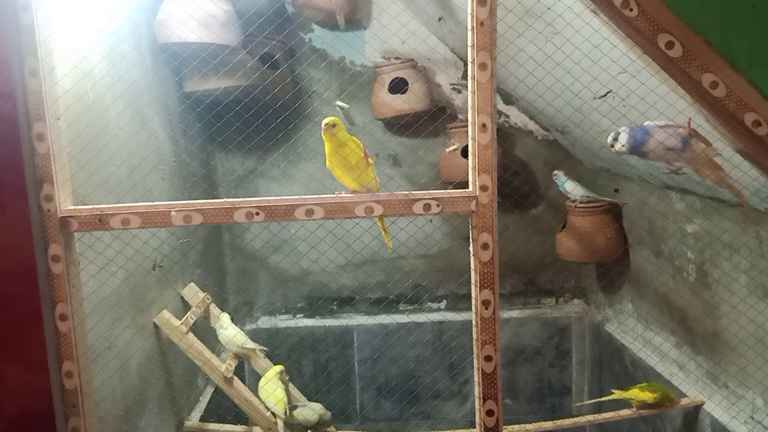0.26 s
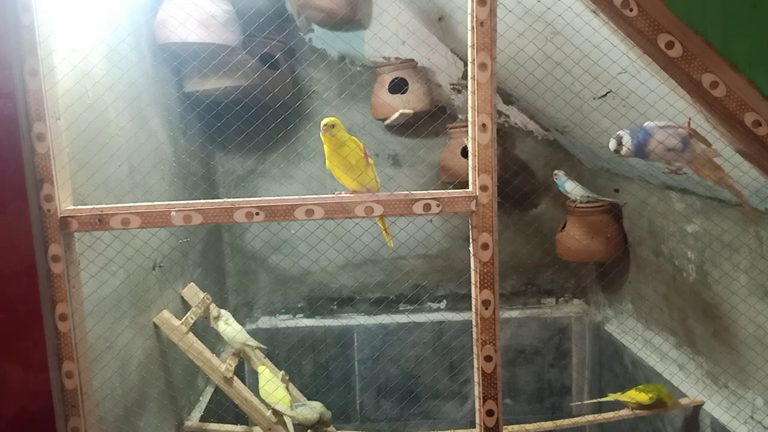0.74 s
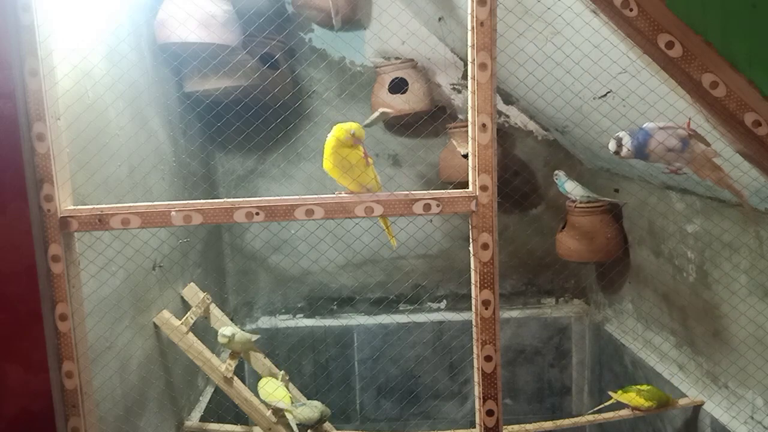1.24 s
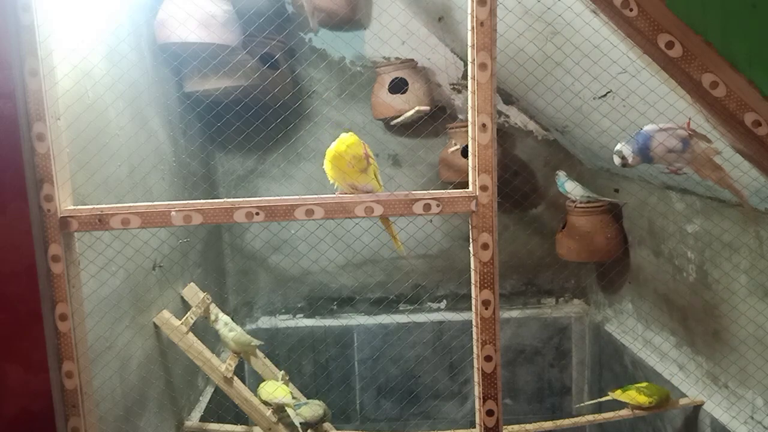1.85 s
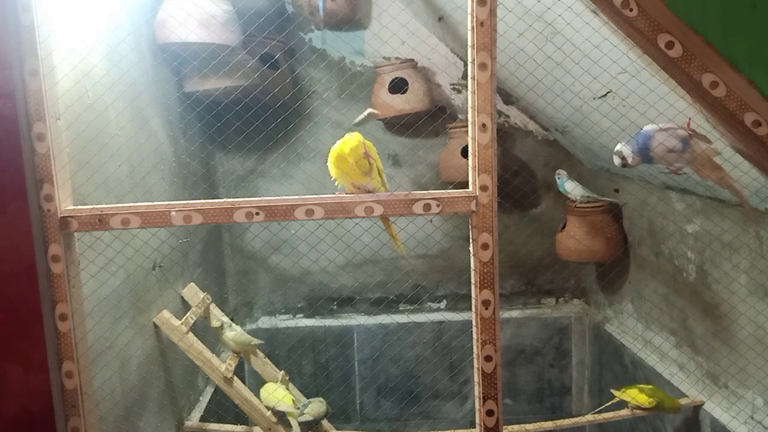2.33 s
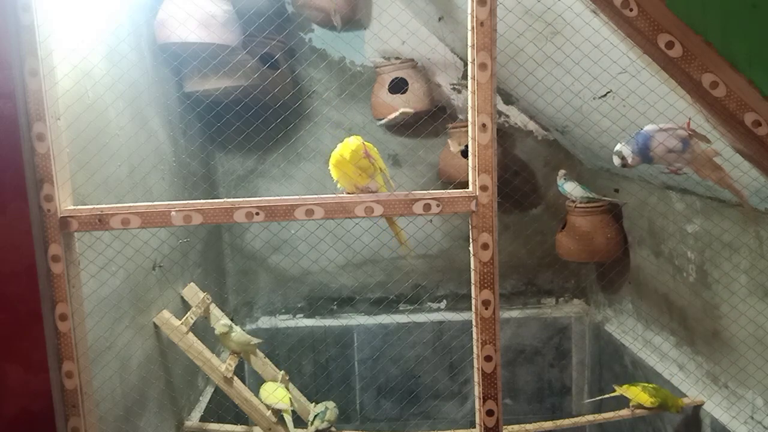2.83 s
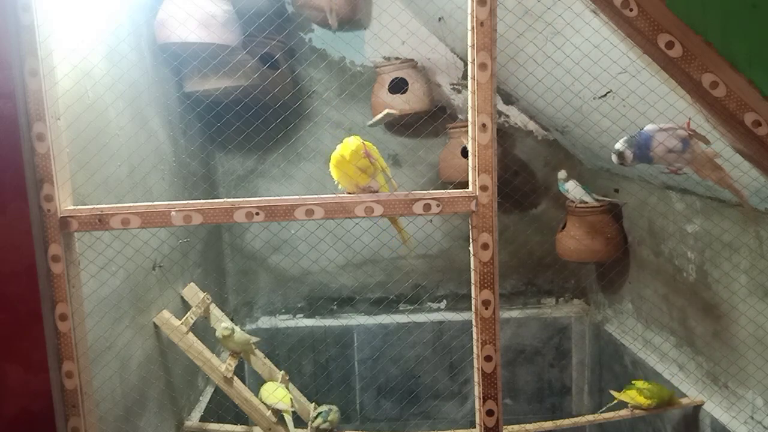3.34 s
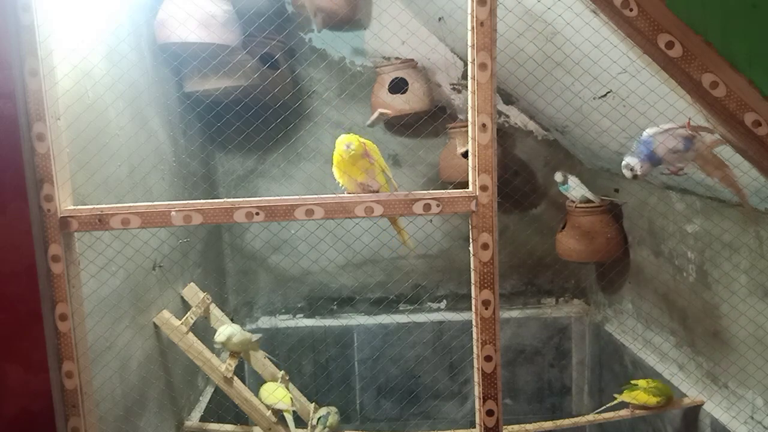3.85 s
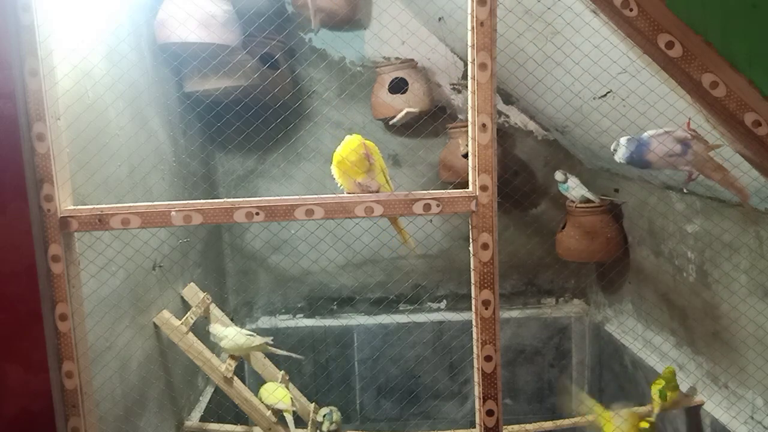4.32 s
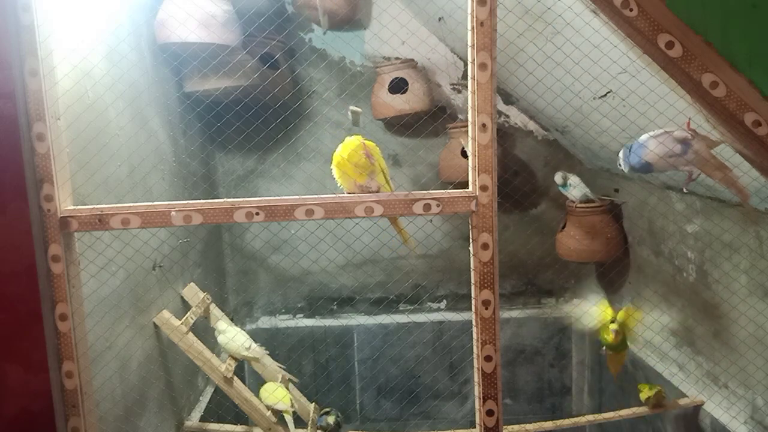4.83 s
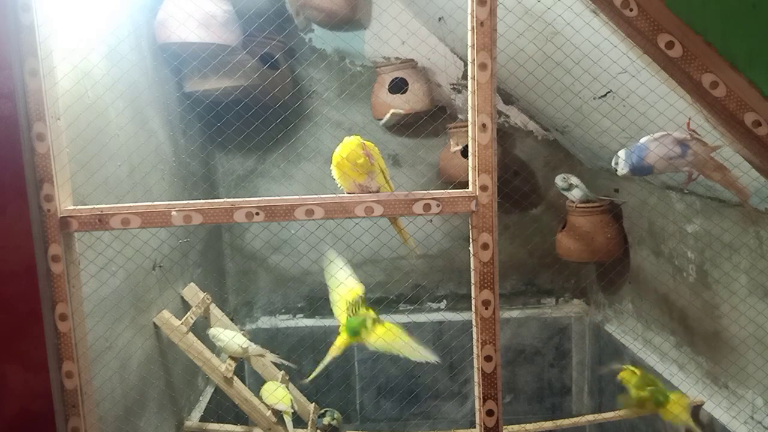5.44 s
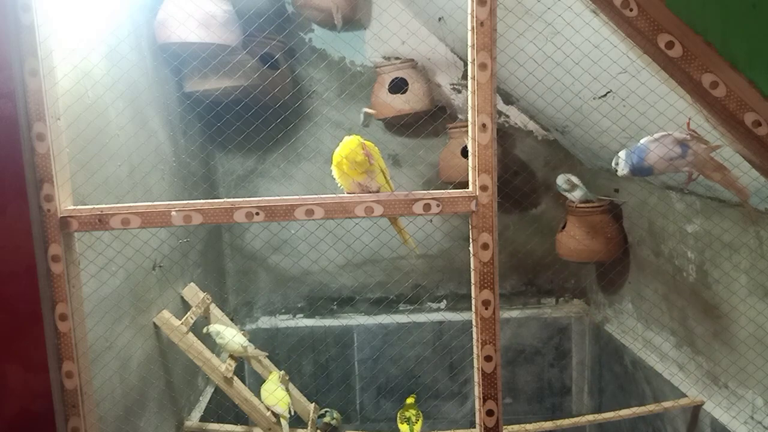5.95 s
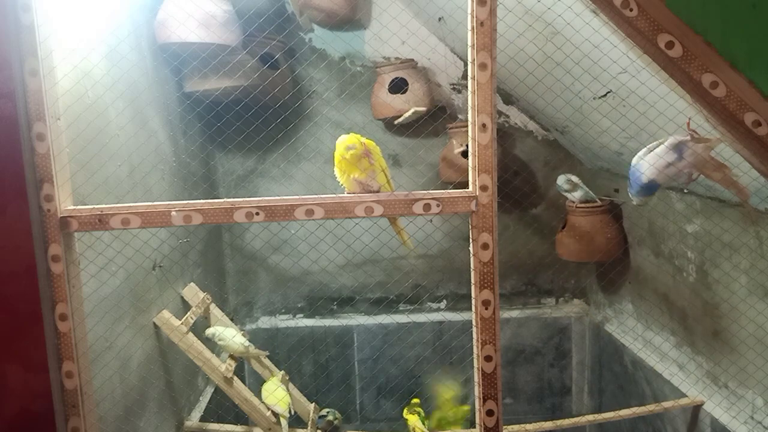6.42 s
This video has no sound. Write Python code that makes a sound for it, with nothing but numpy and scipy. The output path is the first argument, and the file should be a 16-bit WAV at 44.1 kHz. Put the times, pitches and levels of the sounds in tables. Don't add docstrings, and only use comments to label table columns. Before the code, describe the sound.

In a hard-walled aviary, a small parrot gives a quick bright whistle and throaty squawk. Sparse mutters and faint coos follow, then hoarse chatter bursts. After a lull with light wing flaps, denser chatter runs into a loud warble and raspy squawks, with soft fluttering to the end. Room hiss and a thin motor hum continue; stereo camera microphones have dull treble.

```python
import sys
import numpy as np
from scipy import signal
from scipy.io import wavfile
from scipy.ndimage import uniform_filter1d

SR = 44100
rng = np.random.default_rng(int(sys.argv[2]) if len(sys.argv) > 2 else 0)


def attenuation_scalar(level_db):
    decades = np.asarray(level_db, float) / 20
    return 10 ** decades


def generate_wav(signal):
    frames = np.transpose(np.atleast_2d(signal))
    scaled = np.clip(frames, -1, 1) * 32767
    pcm = np.round(scaled).astype(np.int16)
    wavfile.write(sys.argv[1], SR, pcm)


N = 294588


def evened(x):
    return x / np.sqrt(np.mean(x ** 2) + 1e-20)


def read(points, hz):
    f, value = np.transpose(points)
    return np.interp(np.log(hz + 1), np.log(f + 1), value)


def add(mix, s, sound, pan_db=0.):
    part = mix[:, round(s * SR):][:, :len(sound)]
    part += sound[:part.shape[1]] * attenuation_scalar(np.array([[pan_db / 2], [-pan_db / 2]]))


def drift(length, span):
    span = max(int(span), 2)
    return evened(uniform_filter1d(uniform_filter1d(rng.standard_normal(length), span), span))


def resonate(x, hz, width):
    turn = np.exp(2j * np.pi * np.cumsum(hz * np.ones(len(x))) / SR)
    r = np.exp(-np.pi * width / SR)
    low = signal.lfilter([1 - r], [1, -r], x / turn)
    low = signal.lfilter([1 - r], [1, -r], low)
    return 2 * (turn * low).real


def whistles():
    # (start t/s, length t/s, start f/Hz, end f/Hz, level/dB)
    contact = [
        (.543, .018, 4450, 4640, -41),
        (.555, 0.022, 4660, 3293, -26.5),
        (.568, .03, 3355, 3170, -22.5),
        (.578, 0.09, 3980, 3950, -27.5),
        (.604, 0.071, 3280, 3150, -26.5),
    ]
    mutter = [
        (1.784, 0.026, 2420, 2205, -39),
        (1.81, 0.043, 2280, 2096, -39),
        (3.893, 0.047, 1180, 1340, -49),
        (4.012, 0.039, 2200, 2300, -43),
        (4.072, 0.068, 2300, 2530, -47),
        (2.62, .02, 2400, 2460, -43),
        (2.895, .04, 1250, 1350, -50.5),
        (0.93, .022, 4700, 4000, -50),
        (.94, 0.0299, 1300, 1650, -53),
    ]
    twitter = [
        (2.752, .03, 2050, 2410, -42),
        (2.82, 0.0288, 1950, 2090, -42.5),
    ]
    rising = [
        (4.387, 0.031, 1486, 1820, -40.5),
        (4.408, 0.034, 1840, 2097, -27.5),
    ]
    warble = [
        (4.435, 0.0684, 2074, 2350, -24.5),
        (4.478, 0.0601, 2600, 3084, -22.5),
        (4.54, .05, 2970, 3000, -29),
        (4.585, 0.031, 3000, 3006, -20.5),
        (4.612, 0.0217, 2926, 2460, -21),
        (4.54, 0.0259, 2420, 2023, -23.5),
        (4.566, 0.0284, 2006, 2380, -20.5),
        (4.595, 0.033, 2100, 2410, -25.5),
    ]
    pips = [
        (4.45, 0.02, 6220, 6330, -24.5),
        (5.846, 0.022, 5700, 5400, -28),
        (5.845, 0.0184, 6900, 5800, -21),
    ]
    # (notes, left over right level/dB, overtone level/dB)
    birds = [(contact, -3.5, -17.5), (mutter, -4.5, -33), (twitter, -4, -1),
             (rising, -2, -11), (warble, -5.5, -28), (pips, 0, -42)]
    hoarse = [.14, .22, .1, .18, .19, .16]
    glide_share, edge_share = 0.4, 0.42
    third_db = -3
    out = np.zeros((2, N))
    for (notes, pan_db, over_db), rough in zip(birds, hoarse):
        for s, length, from_hz, to_hz, db in notes:
            t = np.arange(0, length, 1 / SR)
            hz = to_hz + (from_hz - to_hz) * np.exp(-(t / (length * glide_share)) ** 1.5)
            hz = hz * (1 + 0.12 * rough * drift(len(t), 60))
            turns = 2 * np.pi * np.cumsum(hz) / SR
            overtones = np.sin(2 * turns) + attenuation_scalar(third_db) * np.sin(3 * turns)
            tone = np.sin(turns) + attenuation_scalar(over_db) * overtones
            flutter = 1 + 0.84 * rough * drift(len(t), 45)
            swell = signal.windows.tukey(len(t), edge_share)
            add(out, s, np.sqrt(2) * attenuation_scalar(db) * tone * flutter * swell, pan_db)
    return out


def squawks():
    # (start t/s, length t/s, effort level/dB, throat level re effort/dB, beak f/Hz)
    calls = [
        (.595, 0.078, -39, 10, 6040),
        (1.957, 0.032, -37, -1.5, 5820),
        (2.175, .088, -35, -3, 5750),
        (4.443, 0.053, -27.5, -8, 5970),
        (4.634, 0.06, -23.5, -6, 6060),
        (4.928, .095, -26, -6, 6230),
        (5.276, 0.096, -26, -5, 6140),
        (5.829, .085, -23.5, -8, 6190),
    ]
    throats = [3020, 3150, 2750, 2350, 3020, 3370, 3150, 3000]
    pans = [-2, 5.5, -1.5, 1, 1, -3, 0, -1.5]
    shrills = [-7, -12, -14.5, -6, -7.5, -8.5, -7.5, -7.5]
    # (factor on beak pitch, width f/Hz, level/dB)
    beak_bands = [(0.94, 1640, -11), (0.789, 670, -14), (1.003, 520, -14.5)]
    # (factor on throat pitch, width f/Hz, level/dB)
    throat_bands = [(1.05, 1460, 14), (0.67, 1400, -4.5), (1.215, 220, 10.5)]
    # (f/Hz, width f/Hz, level/dB)
    shrill_bands = [(8600, 1500, -12), (10400, 2400, -10), (12200, 2400, -13), (14000, 2600, -18)]
    rise_s, fall_s, swell_db = 0.012, 0.0056, 1.5
    puffs_per_s = 158
    beak_sag, throat_lift = 0.047, 0.017
    dip_db, dip_at, dip_width = -0.5, -0.15, 0.057
    out = np.zeros((2, N))
    for (s, length, db, low_db, top_hz), low_hz, pan_db, shrill_db in zip(calls, throats, pans, shrills):
        t = np.arange(0, length, 1 / SR)
        along = t / length - 0.5
        beak_hz = top_hz * (1 - beak_sag * along)
        throat_hz = low_hz * (1 + throat_lift * along)
        turns = np.cumsum(puffs_per_s * (1 + 0.15 * drift(len(t), 200))) / SR
        pulses = np.diff(np.floor(turns), prepend=0) * attenuation_scalar(rng.uniform(-4, 3, len(t)))
        puffs = (0.2 + np.exp(-(turns % 1) / 0.3)) * rng.standard_normal(len(t))
        drive = 0.28 * evened(pulses) + 0.72 * evened(puffs)
        beak = sum(attenuation_scalar(g) * resonate(drive, beak_hz * k, w) for k, w, g in beak_bands)
        beak += attenuation_scalar(shrill_db) * sum(attenuation_scalar(g) * resonate(drive, hz, w) for hz, w, g in shrill_bands)
        throat = sum(attenuation_scalar(g) * resonate(drive, throat_hz * k, w) for k, w, g in throat_bands)
        voice = evened(beak) + attenuation_scalar(low_db) * evened(throat)
        edges = np.clip(np.minimum(t / rise_s, (length - t) / fall_s), 0, 1)
        catch_db = dip_db * np.exp(-((along - dip_at) / dip_width) ** 2)
        effort = edges * attenuation_scalar(db + swell_db * along + catch_db)
        add(out, s, effort * voice, pan_db)
    no_bass = signal.butter(6, 1750, "high", fs=SR, output="sos")
    return signal.sosfilt(no_bass, out)


def chatter():
    # (t/s, peak level/dB, twice the pitch
    # f/Hz, mouth f/Hz, chest level/dB)
    chatter_notes = [(0.946, -54, 2070, 3260, -9), (1.08, -31, 2192, 4440, -31),
                     (1.751, -40, 2280, 2880, 0.5), (1.871, -36.5, 2170, 3100, -6),
                     (2.432, -28, 2240, 3000, -33), (2.499, -33, 2423, 3000, -17),
                     (2.625, -18.5, 2452, 3360, -24), (2.7009, -23.5, 2182, 3500, -15),
                     (2.742, -30, 2064, 3180, -34), (2.756, -31, 2350, 4800, -19),
                     (2.8244, -26.5, 2098, 4350, -18), (2.896, -22.5, 2105, 2900, -16),
                     (3.44, -44.5, 2190, 3080, 3.5), (3.891, -31, 2156, 3230, -5),
                     (3.949, -22, 1984, 4020, -17), (4.0128, -20.5, 2274, 3500, -12.5),
                     (4.069, -22.5, 2380, 4370, -12), (4.1344, -31, 2435, 3270, -9),
                     (4.188, -21, 2282, 3700, -11), (4.2674, -27, 2270, 3300, -9.5),
                     (4.338, -23, 2570, 3240, -12.5), (4.359, -22, 2074, 3140, -38)]
    fade_s = 0.016
    out = np.zeros((2, N))
    for s, db, twice_hz, mouth_hz, chest_db in chatter_notes:
        t = np.arange(0, 0.09, 1 / SR)
        hz = twice_hz / 2 * (1 + 0.04 * drift(len(t), 60) - 0.15 * np.exp(-t / 0.005))
        turns = np.cumsum(hz) / SR
        stack = sum(np.cos(2 * np.pi * k * turns) for k in range(1, 8))
        drive = 0.6 * evened(stack) + 0.75 * rng.standard_normal(len(t))
        voice = 1.3 * resonate(drive, mouth_hz, 1200)
        voice += 0.35 * resonate(drive, twice_hz, 600) + 0.8 * resonate(drive, 2 * twice_hz, 900)
        voice += 1.1 * resonate(drive, 4300, 1800) + 0.56 * resonate(drive, 5450, 1200)
        voice += 0.6 * resonate(drive, 9000, 3500)
        chest = evened(resonate(drive, twice_hz / 2, 890))
        voice = evened(voice) + attenuation_scalar(chest_db - 4.0) * chest
        shape = (1 - np.exp(-t / 0.003)) * np.exp(-(t / fade_s) ** 2)
        add(out, s - 0.003, attenuation_scalar(db - 7.5) * voice * shape, -2.)
    return out


def knocks():
    # (t/s, peak level/dB, wood f/Hz, wire rattle level re peak/dB, fading time t/s)
    taps_on_wood = [
        (0.967, -60, 1590, -46, 0.0069),
        (2.564, -51, 1680, -47, 0.0069),
        (3.152, -61, 1680, -45, 0.014),
        (3.218, -66, 1600, -34, 0.012),
        (4.296, -49, 2760, -49, 0.0037),
        (4.392, -47.5, 2500, -36, 0.0086),
        (4.934, -51, 5800, -38, 0.0037),
        (5.487, -50, 2650, -28.5, 0.0085),
        (6.571, -49.5, 2130, -66, 0.005),
    ]
    out = np.zeros((2, N))
    for s, db, hz, wire_db, length in taps_on_wood:
        t = np.arange(0, 0.06, 1 / SR)
        air = rng.standard_normal(len(t))
        knock = evened(resonate(air, hz, 1200) + 0.8 * resonate(air, 3200, 5000))
        knock += attenuation_scalar(wire_db + 35.0) * evened(resonate(air, 9900, 8900))
        shape = (1 - np.exp(-t / 0.0082)) * np.exp(-t / max(length, 0.002))
        add(out, s - 0.002, attenuation_scalar(db + 24) * knock * shape, -1.)
    return out


def wings():
    # (start t/s, length t/s, thump level/dB, boom level re thump/dB, swish level re thump/dB)
    bouts = [(3.1, 0.21, -55, 1.5, 9.5), (3.28, 0.19, -59, -5, 8.5), (4.394, 0.23, -52, -18, 1),
             (4.601, 0.23, -50.5, -22, 4.5), (4.8, .45, -58, -26, -14), (5.198, 0.49, -57, -10, -8),
             (5.47, 0.17, -52.5, 2.5, 9), (5.597, 0.26, -47.5, -6.5, 5.5), (5.83, .33, -51, -2.5, 5),
             (6.099, 0.32, -51, -5.5, -2), (6.331, 0.29, -54.5, 5.5, 4), (6.55, .2, -54, -6, 8)]
    beats_per_s, edge_share, fade_db = 6.3, 0.39, -3.5
    out = np.zeros((2, N))
    for s, length, db, boom_db, swish_db in bouts:
        t = np.arange(0, length, 1 / SR)
        turns = np.cumsum(beats_per_s * (1 + 0.086 * drift(len(t), 2000))) / SR
        air = (1.0 + np.exp(-(turns % 1) / 1.2)) * rng.standard_normal(len(t))
        beat = evened(resonate(air, 85, 100))
        beat += attenuation_scalar(boom_db) * evened(resonate(air, 185, 16))
        beat += attenuation_scalar(swish_db - 10.0) * evened(resonate(air, 487, 450))
        shape = attenuation_scalar(db + fade_db * t / length) * signal.windows.tukey(len(t), edge_share)
        add(out, s, beat * shape, rng.uniform(-4, 2))
    return out


def coos():
    # (start t/s, length t/s, f/Hz, level/dB)
    hoots = [
        (1., .33, 305, -61),
        (1.82, .22, 290, -60),
        (2.3, .12, 290, -61),
        (2.41, .08, 790, -60),
        (1.73, .06, 880, -60),
        (.66, .08, 870, -60),
    ]
    out = np.zeros((2, N))
    for s, length, hz, db in hoots:
        air = rng.standard_normal(round(length * SR))
        add(out, s, attenuation_scalar(db) * evened(resonate(air, hz, 26.3)) * np.hanning(len(air)) ** 0.5)
    return out


def whine():
    # (start t/s, length t/s, final level/dB)
    swells = [
        (1.098, 1, -81),
        (3.493, 0.6, -85),
        (6.251, 0.405, -80),
    ]
    swell_db = 16
    out = np.zeros((2, N))
    for s, length, db in swells:
        t = np.arange(0, length, 1 / SR)
        swell = attenuation_scalar(db + swell_db * (t / length - 1)) * signal.windows.tukey(len(t), 0.2)
        add(out, s, swell * evened(resonate(rng.standard_normal(len(t)), 9080, 200)))
    return out


def hum():
    # (multiple of the hum, level/dB, left over right level/dB, left lead/radians)
    tones = [(1, -63, 15.5, 2.23), (2, -64, -6.5, 1.1), (3, -60.5, -4, 0.98), (4, -70.5, -21, 0.87),
             (4.998, -66.5, -9.5, 2.3), (3.43, -92, -21.5, 0.73)]
    hum_hz = 536.1
    turns = 2 * np.pi * np.cumsum(hum_hz * (1 + 0.00146 * drift(N, 6100))) / SR
    side = np.array([[0.5], [-0.5]])
    out = np.zeros((2, N))
    for k, db, pan_db, lead in tones:
        strength = attenuation_scalar(db + side * pan_db + 1.95 * drift(N, 3400))
        out += np.sqrt(2) * strength * np.sin(k * turns + side * lead)
    return out


def hiss():
    # (f/Hz, level per Hz/dB)
    colour = [(25, -36.5), (60, -28), (102, -1.5), (190, -12.5), (340, -4.5), (700, -7), (1300, -7),
              (2190, -4), (3500, -11), (6040, -18), (7300, -24.5), (8040, -42), (15000, -76.5)]
    # (f/Hz, likeness 0-1)
    likeness = [(60, 0.91), (180, 0.81), (350, 0.73), (600, 0.071), (1650, 0.027), (9000, 0.13)]
    hiss_db = -52
    frames, hz = N // 256 + 5, np.fft.rfftfreq(1024, 1 / SR)
    a, b, c, d, patches = rng.standard_normal((frames, 513, 5)).T
    patches = 1.3 * evened(uniform_filter1d(uniform_filter1d(patches, 10, 0), 20, 1))
    same = np.clip(read(likeness, hz), -1, 1)[:, None]
    left = a + 1j * b
    right = same * left + np.sqrt(1 - same ** 2) * (c + 1j * d)
    z = np.array([left, right]) * attenuation_scalar(read(colour, hz)[:, None] + patches)
    return attenuation_scalar(hiss_db) * evened(signal.istft(z, nperseg=1024, noverlap=768)[1][:, :N])


def aviary(x, direct_db, walls_db, count):
    # (f/Hz, time to fall 60 dB t/s)
    fading = [(300, 0.33), (1200, 0.85), (2600, 0.75), (6500, 0.63), (9000, 0.53), (13000, 0.48)]
    taps, starts = np.zeros((2, 36000)), np.arange(120, 35900, 16)
    at = starts + rng.integers(0, 16, (2, len(starts)))
    np.put_along_axis(taps, at, rng.choice([-1., 1.], at.shape), 1)
    hz, t, z = signal.stft(taps, SR, nperseg=128)
    tail = signal.istft(z * attenuation_scalar(-60 * t / read(fading, hz)[:, None]), SR, nperseg=128)[1]
    tail = tail / np.linalg.norm(tail[0])
    walls = signal.fftconvolve(x.mean(0)[None], tail, axes=1)[:, :N]
    direct = np.array([x[0], np.roll(x[1], count)])
    return attenuation_scalar(direct_db) * direct + attenuation_scalar(walls_db) * walls


def microphone(x):
    # (f/Hz, level/dB)
    loss = [(1000, 0.1), (6900, 0.1), (7400, -7), (7900, -22), (8600, -28), (9800, -27), (13000, -22),
            (15300, -25)]
    hz = [0, *[f for f, g in loss], SR / 2]
    gain = [1, *[attenuation_scalar(g) for f, g in loss], 0]
    return signal.oaconvolve(x, signal.firwin2(255, hz, gain, fs=SR)[None], "same")


def scene():
    birds = aviary(whistles(), 0.67, -2.26, count=3)
    birds += aviary(squawks(), 1.46, 1.94, count=2)
    birds += aviary(attenuation_scalar(3.5) * chatter() + knocks(), 0, -5, count=5)
    return microphone(birds) + wings() + coos() + whine() + hum() + hiss()


def top_cut(x):
    return signal.sosfilt(signal.butter(12, 15480, fs=SR, output="sos"), x)


def record(dry):
    cut = signal.sosfilt(signal.butter(5, 48, "high", fs=SR, output="sos"), dry)
    hz, t, z = signal.stft(cut, SR, nperseg=2048)
    bin_db = 20 * np.log10(abs(z) + 1e-12)
    loud_db = 10 * np.log10((abs(z) ** 2).sum(1, keepdims=True) + 1e-12)
    patch_db = 6 * np.repeat(rng.standard_normal((len(t), 33)).T, 32, 0)[:len(hz)]
    hidden = (bin_db < loud_db - 59 + patch_db) & (hz > 7300)[:, None]
    mix = signal.istft(z * ~hidden, SR, nperseg=2048)[1][:, :N]
    return top_cut(mix)


dry = scene()
out = record(dry)
generate_wav(out)
```